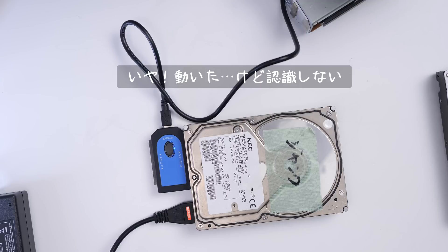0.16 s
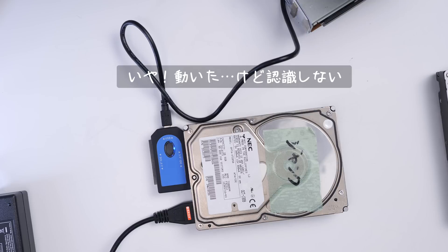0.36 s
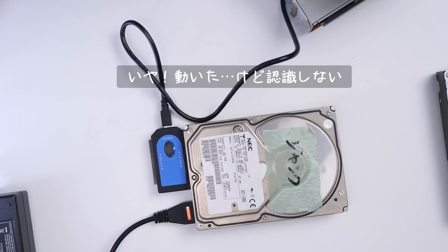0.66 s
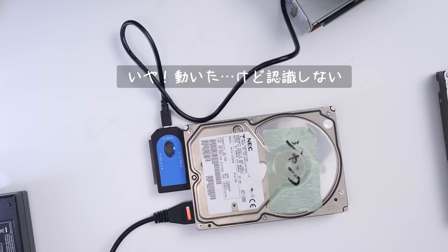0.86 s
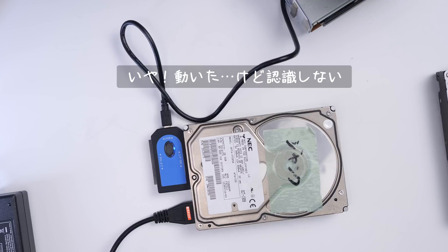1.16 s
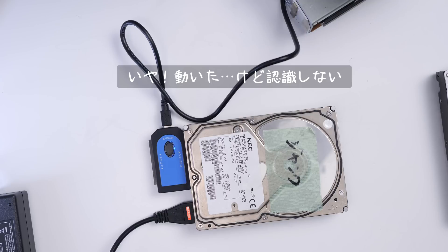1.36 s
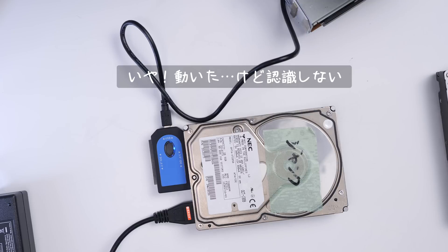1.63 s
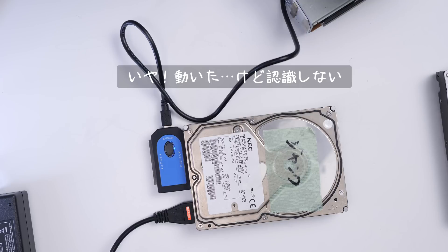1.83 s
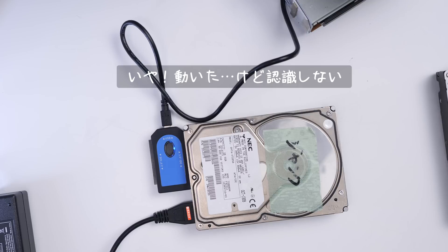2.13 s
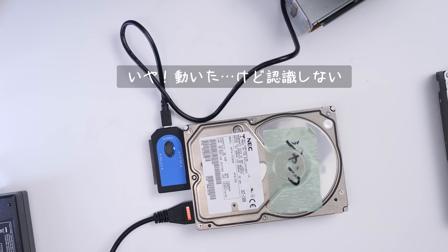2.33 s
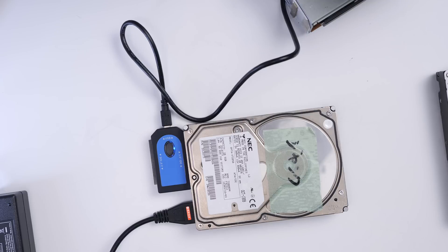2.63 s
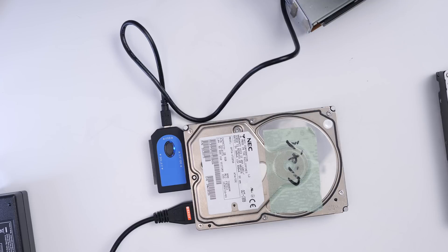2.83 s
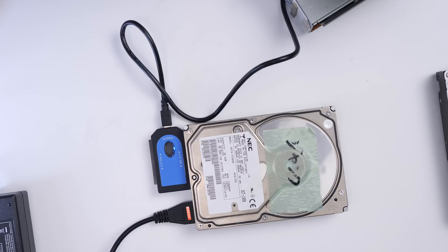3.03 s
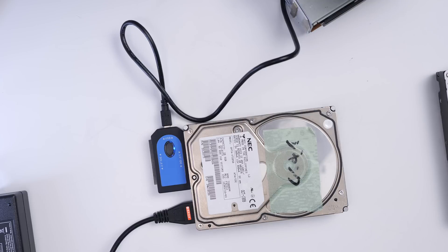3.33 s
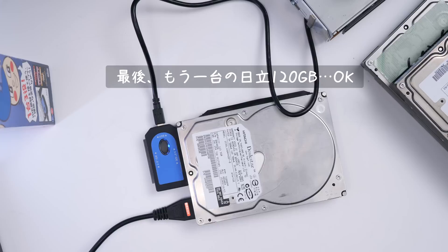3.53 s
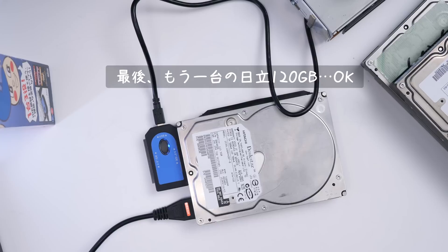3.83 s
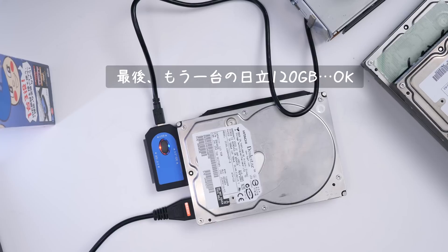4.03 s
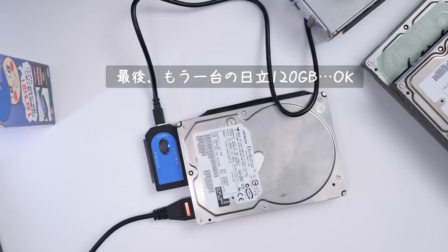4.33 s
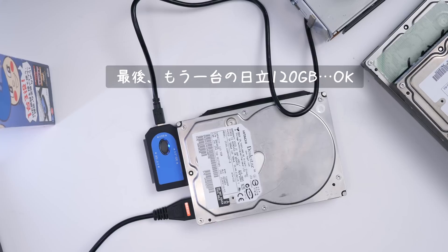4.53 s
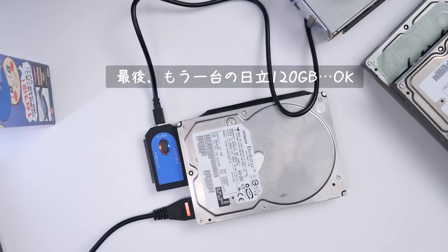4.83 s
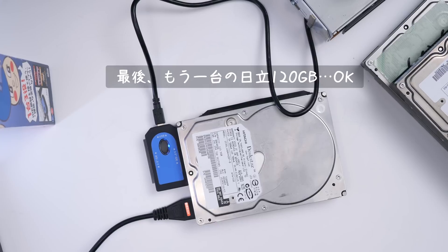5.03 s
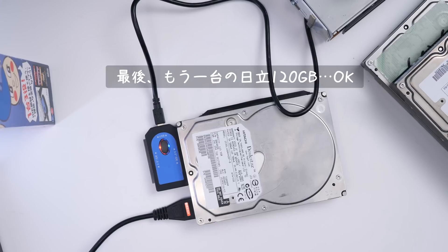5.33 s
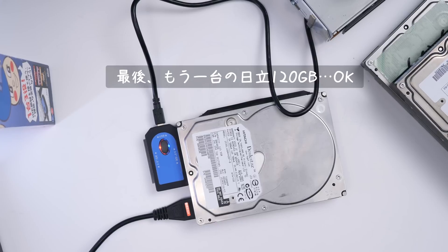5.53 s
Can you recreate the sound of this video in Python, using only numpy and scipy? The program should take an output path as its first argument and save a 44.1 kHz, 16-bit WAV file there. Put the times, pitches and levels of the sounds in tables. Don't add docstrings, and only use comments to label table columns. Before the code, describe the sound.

Close, dry, nearly mono sound of hard drives on a desk. From 0 to 3.5 s a worn drive runs steadily: a dense, piercing bearing whine with slow beating and a thick airy hiss. Its arm clicks out and back in tight pairs, about 0.05 s apart, starting at 0.1 s and repeating alternately every 0.2 to 0.3 s. A faint ping at 0.55 s and a light graze at 0.6 s slip between. One high tone fades after 2 s. At 3.47 s the arm slams its stop with a bright metallic rattle, cut off at 3.53 s. A much quieter drive follows: low motor hum, soft air and dull ticks at random, clustered near 4.1, 4.8 and 5.5 s. A soft hand knock and scrape come at 4.2 s, a barely audible high squeak at 4.4 s, and sharp little snaps at 4.92 and 5.06 s. It stops at about 5.7 s, still running.

```python
import sys
import numpy as np
from scipy import signal
from scipy.fft import rfft, irfft, next_fast_len
from scipy.io import wavfile
from scipy.ndimage import uniform_filter1d, map_coordinates

SR = 44100
rng = np.random.default_rng(int(sys.argv[2]) if len(sys.argv) > 2 else 0)


def nominal_scale(level):
    x = np.asarray(level, float) / 20
    return 10 ** x


def store_wav(level_fs):
    pcm = np.round(np.clip(np.atleast_2d(level_fs), -1, 1) * 32767)
    wavfile.write(sys.argv[1], SR, pcm.T.astype(np.int16))


N = 250047
T = np.arange(N) / SR


def unit(x):
    return x / np.sqrt(np.mean(x ** 2) + 1e-20)


def along(points, hz):
    f, v = np.transpose(points)
    return np.interp(np.log(hz + 1), np.log(f + 1), v)


def wobble(rate):
    coarse = T[::200]
    knots = rng.standard_normal(int(N * rate / SR) + 4)
    return np.interp(T, coarse, map_coordinates(knots, [coarse * rate]))


def filtered(x, response):
    m = next_fast_len(N + SR // 2)
    spectrum = rfft(x, m) * response(np.fft.rfftfreq(m, 1 / SR))
    return irfft(spectrum, m)[..., :N]


def rung(force, body, sign=-1):
    out = np.zeros(N)
    for k, (hz, width, db) in enumerate(body):
        r = np.exp(-np.pi * width / SR)
        c = r * np.cos(2 * np.pi * hz / SR)
        out += sign ** k * nominal_scale(db) * signal.lfilter([1, -c], [1, -2 * c, r * r], force)
    return out


def add(track, s, piece):
    part = track[round(s * SR):][:len(piece)]
    part += piece[:len(part)]


def tone(hz, db, slip, flutter_db):
    phase = 2 * np.pi * (hz * T + rng.random()) + slip * wobble(21.83)
    flutter = 1 + (nominal_scale(flutter_db) - 1) * wobble(14)
    return np.sqrt(2) * nominal_scale(db) * flutter * np.sin(phase)


def rush(spectrum, humps, patchy_db, thicket_db):
    z = signal.stft(rng.standard_normal(N + 512), nperseg=512)[2]
    field = uniform_filter1d(rng.standard_normal(z.shape), size=6, axis=0)
    field = uniform_filter1d(field, size=10, axis=1)
    noise = signal.istft(z * nominal_scale(patchy_db * unit(field)), nperseg=512)[1][:N]
    grid = np.arange(0, SR / 2, 7)
    peaks = np.clip(rng.exponential(size=len(grid)) - 1, 0, 2.5) * (grid > 1500)

    def response(f):
        lift = sum(db / (1 + (2 * (f - c) / w) ** 2) for c, w, db in humps)
        return nominal_scale(along(spectrum, f) + lift + thicket_db * np.interp(f, grid, peaks))

    return unit(filtered(noise, response))


def burst(length, t60, blow, grit):
    t = np.arange(round(length * SR)) / SR
    return blow * (t == 0) + grit * rng.standard_normal(len(t)) * nominal_scale(-60 * t / t60)


def soft(length):
    push = np.hanning(round(length * SR))
    return push / push.sum()


def spin_1():
    # (frequency [Hz], rms level [dB])
    whine = [(120.5, -63), (1648.2, -65), (1936.0, -73), (2418.5, -69), (2486.2, -56), (2503.8, -67),
             (2577.5, -62), (2651.0, -72), (2830.5, -67), (3087.5, -62), (3377.5, -69), (3388.2, -66),
             (4339.2, -52), (4356.2, -62), (5008.8, -66), (5141.0, -64), (5397.8, -70), (6292.2, -75),
             (6776.2, -69), (7744.2, -64), (7785.0, -71), (8228.8, -68), (8837.0, -77), (11469.5, -77),
             (11561.8, -78), (13018.0, -72), (13108.2, -78), (13623.8, -81), (2941.4, -66), (2893.4, -68)]
    # (frequency [Hz], rms level [dB])
    faint = [(3041, -67), (3219.5, -69), (3316, -72), (3461, -71), (3505, -69), (3682, -70), (3806, -66),
             (3869, -66), (4134, -68), (5744, -77), (8019.2, -74), (8712.5, -78), (9941.5, -81),
             (10015.2, -81), (11383.5, -80), (11655, -80), (12454.2, -80), (12592, -79), (15170, -85)]
    # (frequency [Hz], [(time [s], level [dB])])
    drifting = [
        (1451.8, [(0, -54), (2.3, -52.5), (2.9, -62), (3.5, -55)]),
        (2339, [(0, -51), (1.2, -50), (2, -57), (2.8, -69), (3.5, -75)]),
    ]
    # (frequency [Hz], beats [1/s], a null [s])
    beating = (1544.4, 4.16, .167)
    # (frequency [Hz], density [dB per Hz])
    air = [(15, -59), (25, -12.5), (100, -11.5), (160, -13.5), (400, -16.5), (700, -16.5), (1250, -16),
           (1820, -18.5), (3680, -21.5), (5600, -19), (8000, -22.5), (9200, -26), (12300, -24.5),
           (15800, -32)]
    # (frequency [Hz], width [Hz], height [dB])
    case = [(202, 32, 7.5), (931, 114, 14), (1500, 14, 20), (2570, 360, 13), (2700, 120, -17),
            (3010, 500, 13), (3830, 52, -15), (4100, 130, -12), (4920, 480, 8.5), (5820, 340, -7.5),
            (6820, 300, 2), (7840, 330, 12.5), (11500, 400, 5), (13300, 300, 5)]

    tones = sum(tone(hz, db, slip=.12, flutter_db=1.2) for hz, db in whine + faint)
    for hz, rows in drifting:
        tones += tone(hz, np.interp(T, *np.transpose(rows)), slip=.12, flutter_db=.8)
    hz, rate, null = beating
    beat = np.sqrt(2) * np.sin(np.pi * rate * (T - null))
    tones += tone(hz, -58, slip=.1, flutter_db=.6) * beat
    air_level = nominal_scale(-50.5 + 1.5 * wobble(4.66))
    return tones + air_level * rush(air, case, patchy_db=.5, thicket_db=5.5)


def seeks_1():
    # (start [s], stay [s])
    retries = [(.1025, .0525), (.3876, .0494), (.6003, .0511), (.8871, .0493), (1.0988, .0519),
               (1.3865, .0484), (1.5956, .0516), (1.8862, .0538), (2.1024, .0536), (2.3873, .0511),
               (2.601, .0506), (2.8873, .0481), (3.0974, .052), (3.3872, .0452)]
    # (arm level [dB], yoke level [dB])
    out_kicks = [
        (-2.5, -1.5),
        (-6.5, -8),
    ]
    # (arm level [dB], yoke level [dB])
    back_kicks = [
        (-1, -8),
        (-7.5, 2.5),
    ]
    # (frequency [Hz], width [Hz], level [dB])
    arm_modes = [(984, 33, -16.5), (1734, 110, -11), (2960, 170, -11.5), (3870, 72, 0.5), (4014, 144, -0.5),
                 (5100, 890, -6), (7230, 260, -8.5), (7740, 340, -6.5), (9960, 71, -21.5),
                 (13200, 790, -10.5)]
    # (frequency [Hz], width [Hz], level [dB])
    broad_modes = [(2190, 1500, 5), (6700, 2100, -11), (12000, 5000, -21)]
    # (frequency [Hz], width [Hz], level [dB])
    yoke_modes = [(4400, 150, 4), (10450, 75, -9.5)]
    # (frequency [Hz], width [Hz], level [dB])
    pivot_modes = [(1449, 24, 0), (1449, 60, 0)]
    # (time after start [s], level [dB])
    pivot_pushes = [
        (.0005, -51),
        (.002, -49.5),
    ]
    scatter_db = 1.7

    arm, yoke, pivot = np.zeros((3, N))
    out, stay = np.transpose(retries)
    way_levels_db = (-28, -29)
    way_lags = ((0, .0085), (0, .0078))
    ways = zip((out, out + stay), way_levels_db, way_lags, (out_kicks, back_kicks), pivot_pushes)
    for starts, way_db, lags, kicks, (pivot_lag, pivot_db) in ways:
        for s in starts:
            db = way_db + scatter_db * rng.standard_normal()
            chatter = nominal_scale(db - 4) * burst(.016, t60=.08, blow=0, grit=.018)
            for after, (arm_db, yoke_db) in zip(lags, kicks):
                shape = burst(.007, t60=.05, blow=.95, grit=.06)
                add(arm, s + after, nominal_scale(db + arm_db - 5.0) * shape)
                add(yoke, s + after, nominal_scale(db + yoke_db - 6.5) * shape)
            add(arm, s, chatter)
            add(yoke, s, chatter)
            add(pivot, s + pivot_lag, nominal_scale(db + pivot_db) * np.ones(1))
    pivot_ring = rung(rung(pivot, pivot_modes[1:]), pivot_modes[:1])
    return rung(arm, arm_modes + broad_modes) - rung(yoke, yoke_modes) + pivot_ring


def slams():
    # (time [s], level [dB], frequency [Hz], width [Hz])
    ping_event = (.555, -44, 3090, 16)
    # (time [s], level [dB])
    touch = (.6138, -26.5)
    # (frequency [Hz], width [Hz], level [dB])
    head_modes = [(3440, 230, -2), (3820, 150, -2.5), (5130, 210, -2), (7050, 250, -9), (7850, 400, -7)]
    # (time [s], rms level [dB], t60 [s])
    slam = (3.4715, -30, .5)
    # (frequency [Hz], width [Hz], level [dB])
    cover_modes = [(1450, 24, -8.5), (1648, 23, -12), (1940, 37, -21), (2350, 24, -15), (2896, 25, -8),
                   (2940, 25, -5), (3083, 30, 0), (3135, 28, -11), (3627, 33, -11), (3870, 23, -8),
                   (4352, 22, -11), (5150, 42, -15), (5390, 21, -24), (7740, 22, -22)]
    # (frequency [Hz], width [Hz], level [dB])
    fill_modes = [(1600, 1100, -13), (2300, 1100, 17), (2940, 120, 23), (3450, 440, 25.5), (4260, 610, 20),
                  (4970, 250, 18), (6750, 850, 14), (8000, 390, 18), (9900, 1500, -19)]

    ping, graze, blow, rattle = np.zeros((4, N))
    add(ping, ping_event[0], nominal_scale(ping_event[1]) * burst(0.0031, t60=.02, blow=1.0, grit=0.04))
    add(graze, touch[0], nominal_scale(touch[1]) * burst(0.011, t60=0.04, blow=0.55, grit=0.13))
    light = rung(ping, [(*ping_event[2:], 0)]) + rung(graze, head_modes)

    s, db, t60 = slam
    add(blow, s, burst(.002, t60=.01, blow=21, grit=.8))
    add(rattle, s, burst(.07, t60=t60, blow=0, grit=0.63))
    free = [(hz, w / 6, level + 11) for hz, w, level in cover_modes]
    damped = [(hz, 3 * w, level + 10 * np.log10(w)) for hz, w, level in cover_modes]
    ring = rung(blow, free) + rung(rattle, damped + fill_modes)
    first_50_ms = ring[round(s * SR):][:SR // 20]
    return light + nominal_scale(db) * ring / np.std(first_50_ms)


def spin_2():
    # (multiple of the shaft rate, rms level [dB])
    orders = [(10, -73), (11, -74), (19, -77), (24, -72), (25, -77), (60, -78), (98, -69.5), (108, -74)]
    # (multiple of the shaft rate, [(time [s], level [dB])])
    fading = [
        (36, [(3.5, -99), (4.1, -74), (4.6, -70.5), (5.7, -69)]),
        (72, [(3.5, -71), (4.2, -68), (4.6, -78), (5.7, -89)]),
    ]
    # (frequency [Hz], density [dB per Hz])
    air = [(15, -59), (25, -17.5), (100, -12), (160, -16.5), (270, -19), (700, -19.5), (1180, -25),
           (1820, -28), (2460, -26.5), (4200, -33.5), (5090, -32.5), (8970, -35.5), (12100, -40),
           (15800, -41)]
    # (frequency [Hz], width [Hz], height [dB])
    case = [(196, 41, 5.5), (830, 1400, 3), (3437, 480, 13), (6800, 1100, 0)]
    shaft_hz = 119.98

    tones = tone(shaft_hz, -54, slip=.04, flutter_db=.5)
    tones += sum(tone(k * shaft_hz, db, slip=.1, flutter_db=.8) for k, db in orders)
    for k, rows in fading:
        tones += tone(round(k) * shaft_hz, np.interp(T, *np.transpose(rows)), slip=.1, flutter_db=.8)
    air_level = nominal_scale(-54 + 0.15 * wobble(4.81))
    return tones + air_level * rush(air, case, patchy_db=1.5, thicket_db=4.5)


def kicks_2():
    # (time [s], arm [dB], cover [dB], frame [dB], heads [dB])
    long_seeks = [(3.6505, -40.5, -41.5, -43.5, -45), (3.7154, -39.5, -43.5, -43.5, -48.5),
                  (4.1788, -41.5, -41.5, -43, -46), (4.7576, -42, -44.5, -43.5, -45.5),
                  (4.7806, -38.5, -41.5, -42, -47), (4.88, -36.5, -46, -38.5, -55),
                  (4.9673, -39.5, -43, -45, -47), (5.1685, -39, -41, -42, -47),
                  (5.577, -41, -42, -43.5, -47), (5.5967, -39.5, -40.5, -46, -50)]
    # (time [s], arm [dB], cover [dB], frame [dB])
    short_seeks = [(3.7584, -37, -45, -40.5), (3.9635, -41, -45, -40), (4.0953, -44, -43, -41),
                   (4.108, -44, -42, -42.5), (4.135, -50, -49, -46), (4.203, -45, -51.5, -41),
                   (4.36, -38, -49, -40), (4.5608, -62, -44, -47), (4.8005, -46, -40, -36.5),
                   (5.3703, -40.5, -44, -40.5), (5.4445, -41, -43.5, -40), (5.4604, -45, -43, -39),
                   (5.481, -46, -43, -44.5), (5.4936, -44.5, -43, -47)]
    travel_s = .0079
    brake_arm_db, brake_cover_db, brake_frame_db = -6.5, 2, 0.3

    kicks = [(s, arm, cover, frame, -52.5) for s, arm, cover, frame in short_seeks]
    for s, arm, cover, frame, heads in long_seeks:
        kicks.append((s, arm, cover, frame, heads - 6))
        kicks.append((s + travel_s, arm + brake_arm_db, cover + brake_cover_db, frame + brake_frame_db, heads))
    return kicks


def seeks_2():
    # (frequency [Hz], width [Hz], level [dB])
    arm_modes = [(4557, 430, 5.5), (4754, 355, -3), (3690, 350, -5)]
    # (frequency [Hz], width [Hz], level [dB])
    cover_modes = [(1430, 170, 6), (1883, 50, -4), (2505, 230, 6.5), (2400, 5800, -6)]
    # (frequency [Hz], width [Hz], level [dB])
    heads_modes = [(8560, 480, 4), (9660, 130, -2.5), (10400, 200, 0), (11470, 52, -1.5), (11900, 500, 3)]
    # (frequency [Hz], width [Hz], level [dB])
    frame_modes = [(469, 26, 0)]

    arm, cover, heads, frame = np.zeros((4, N))
    for s, arm_db, cover_db, frame_db, heads_db in kicks_2():
        kick = burst(.009, t60=.022, blow=.55, grit=.11)
        add(arm, s, nominal_scale(arm_db + 3.5) * burst(.007, t60=0.025, blow=0.66, grit=0.075))
        add(cover, s, nominal_scale(cover_db - 7.0) * kick)
        add(heads, s + 0.0013, nominal_scale(heads_db - 3.5) * kick)
        add(frame, s + 0.00377, nominal_scale(frame_db) * soft(0.0014))
    below = signal.butter(3, 5600, fs=SR, output="sos")
    band = signal.butter(3, [7500, 12800], "band", fs=SR, output="sos")
    dull = signal.sosfilt(below, rung(arm, arm_modes) + rung(cover, cover_modes))
    thin = signal.sosfilt(band, rung(heads, heads_modes))
    return dull + thin + rung(frame, frame_modes)


def snaps():
    # (time [s], peak level [dB], t60 [s], treble [dB])
    clicks = [
        (3.8043, -51, 0.043, -10),
        (4.7037, -54, 0.045, 7),
        (4.9212, -37.5, 0.15, 1),
        (5.0614, -36.5, 0.16, 3),
    ]
    # (frequency [Hz], width [Hz], level [dB])
    modes = [(850, 41, -12), (2170, 270, -2.5), (3580, 73, -3.5), (4580, 240, 1.5), (7300, 240, 3.5),
             (8460, 160, 4), (9020, 230, 6.5), (10800, 100, -12), (11300, 120, -5.5), (11600, 87, -8),
             (14700, 510, 0), (15400, 160, -14)]

    low, high = np.zeros((2, N))
    for s, db, t60, treble_db in clicks:
        force = burst(.12, t60=t60, blow=0.39, grit=0.062)
        force += burst(.12, t60=0.029, blow=0, grit=0.1)
        add(low, s, nominal_scale(db - 9.5) * force)
        add(high, s, nominal_scale(db - 8 + treble_db) * force)
    wide = [(hz, 3 * w, db + 9) for hz, w, db in modes]
    return rung(low, wide[:7]) + rung(high, wide[7:])


def knock():
    # (time [s], level [dB])
    blows = [
        (4.1746, -32.5),
        (4.19, -35.5),
        (4.197, -32.5),
        (4.205, -29.5),
        (4.222, -33.5),
        (4.238, -43),
    ]
    # (time [s], level [dB], frequency [Hz], width [Hz])
    panel_event = (4.21, -46.5, 212, 3)
    # (frequency [Hz], width [Hz], level [dB])
    desk_modes = [(140, 27, 1), (189, 14.4, -1.5), (260, 40, -1), (317, 46, -14)]
    # (frequency [Hz], width [Hz], level [dB])
    edge_modes = [(466, 49, -19), (625, 25, -12), (715, 30, -16), (850, 75, -4.5)]
    # (frequency [Hz], width [Hz], level [dB])
    scrape_modes = [(886, 130, -2.5), (1600, 260, -1.5), (2190, 310, -5), (2670, 100, -3), (4240, 1800, 5)]
    palm_s, knuckle_s = .003, .001

    palm, knuckle, scrape, panel = np.zeros((4, N))
    add(panel, panel_event[0], nominal_scale(panel_event[1]) * soft(palm_s))
    for s, db in blows:
        add(palm, s, nominal_scale(db + 4.5) * soft(palm_s))
        add(knuckle, s + 0.0021, nominal_scale(db + 3.0) * soft(knuckle_s))
    stroke = np.hanning(SR // 18) * rng.standard_normal(SR // 18)
    add(scrape, 4.178, nominal_scale(-60) * stroke)
    add(scrape, 4.2, nominal_scale(-62.5) * burst(0.096, t60=0.25, blow=0, grit=0.95))
    palm = signal.lfilter(*signal.butter(2, 100, "high", fs=SR), palm)
    desk = rung(palm, desk_modes, sign=0.87) + rung(knuckle, edge_modes)
    return desk + rung(panel, [(*panel_event[2:], 0)]) + rung(scrape, scrape_modes)


def squeak():
    # (start [s], end [s], frequency [Hz], level [dB])
    whistle = (4.37, 4.49, 7950, -71)
    start, end, hz, db = whistle
    swell = np.sin(np.pi * np.clip((T - start) / (end - start), 0, 1))
    return tone(hz, db, slip=1.5, flutter_db=0.0) * swell


def scene():
    after = np.clip((T - 3.5283) / 0.0012, 0, 1)
    first = spin_1() + seeks_1() + slams()
    second = spin_2() + seeks_2() + snaps() + knock() + squeak()
    mid = (1 - after) * first + after * second
    hiss_curve = [(30, 2), (500, 1), (1000, -13), (8000, -6), (15000, 1)]  # (frequency [Hz], level [dB])
    hiss = unit(rng.standard_normal(N))
    side = nominal_scale(-78) * filtered(hiss, lambda f: nominal_scale(along(hiss_curve, f)))
    return np.array([mid + side, mid - side])


def low_pass(x):
    return signal.sosfilt(signal.butter(12, 16500, fs=SR, output="sos"), x)


def record(dry):
    mix = filtered(dry, lambda f: f < 15830)
    return low_pass(mix)


dry = scene()
out = record(dry)
store_wav(out)
```